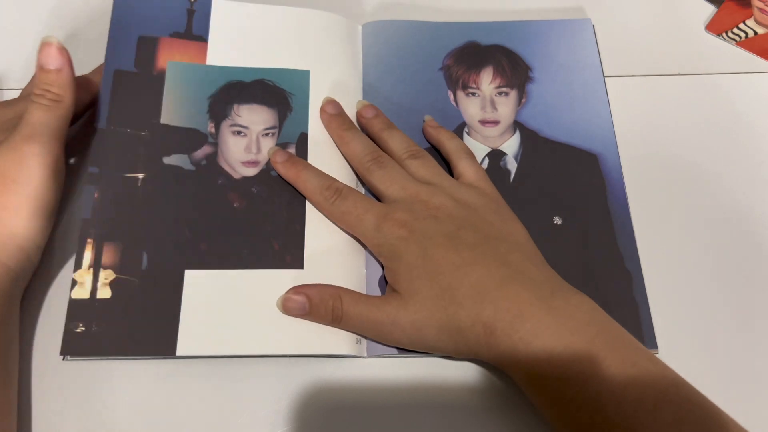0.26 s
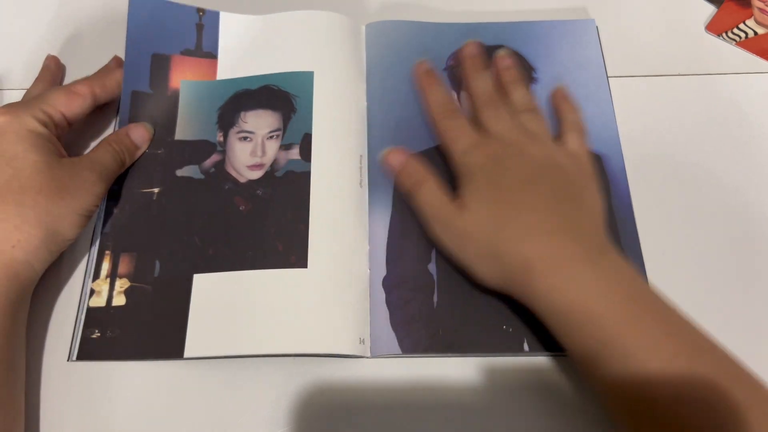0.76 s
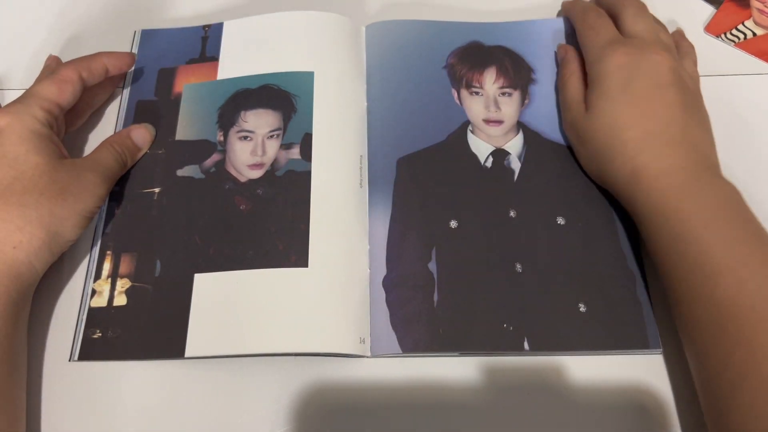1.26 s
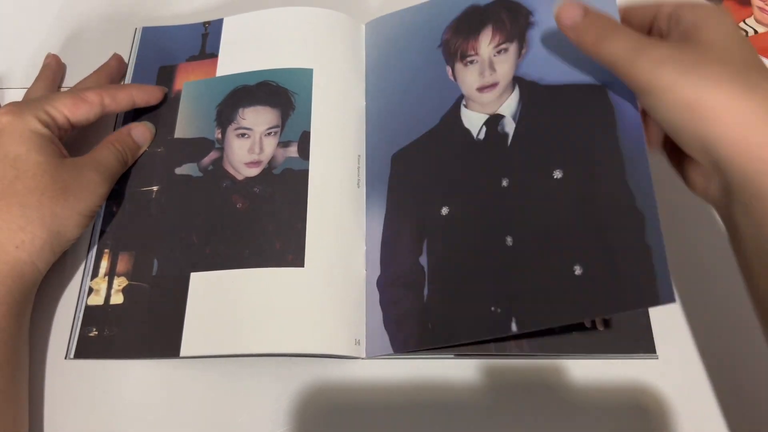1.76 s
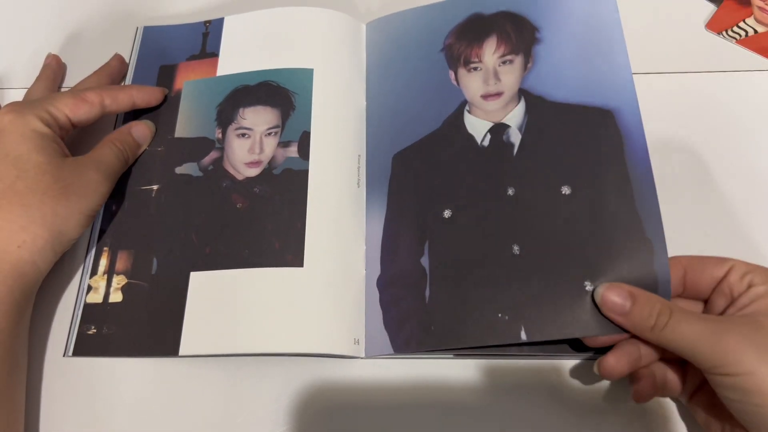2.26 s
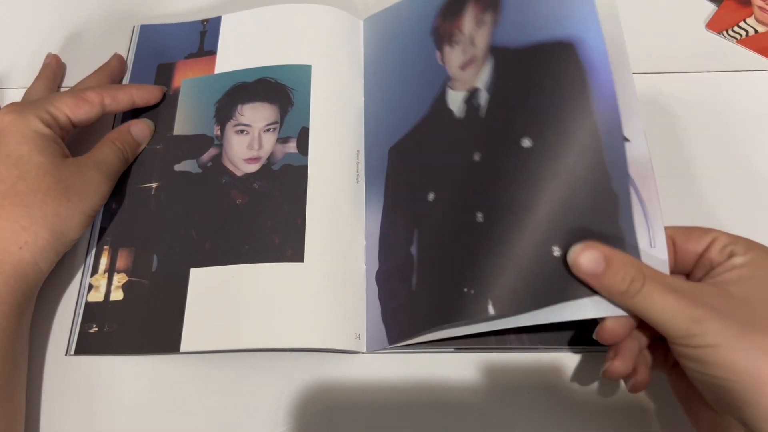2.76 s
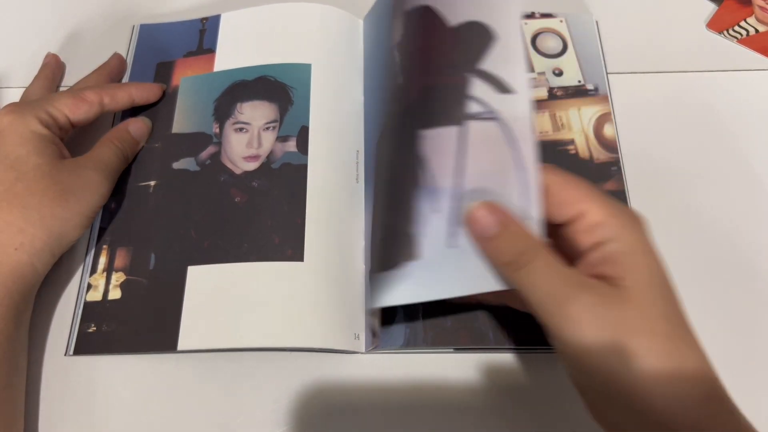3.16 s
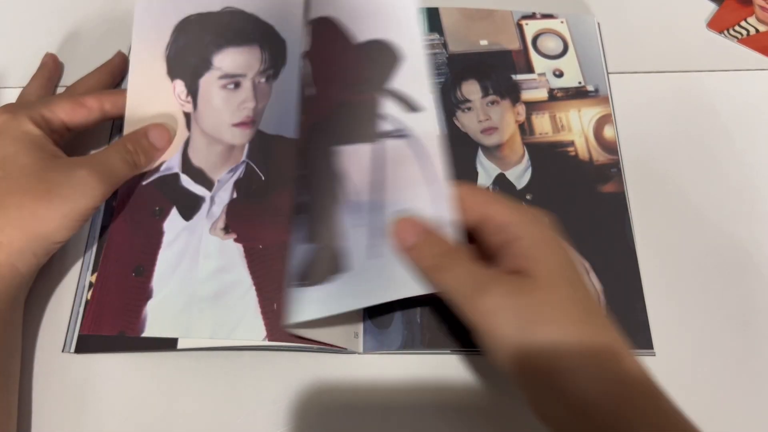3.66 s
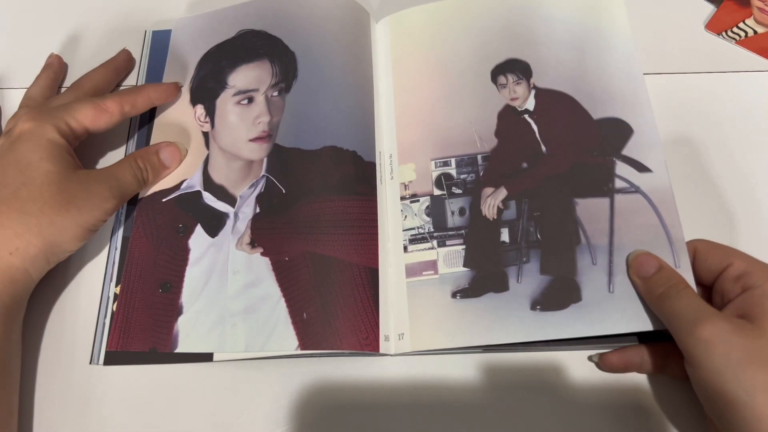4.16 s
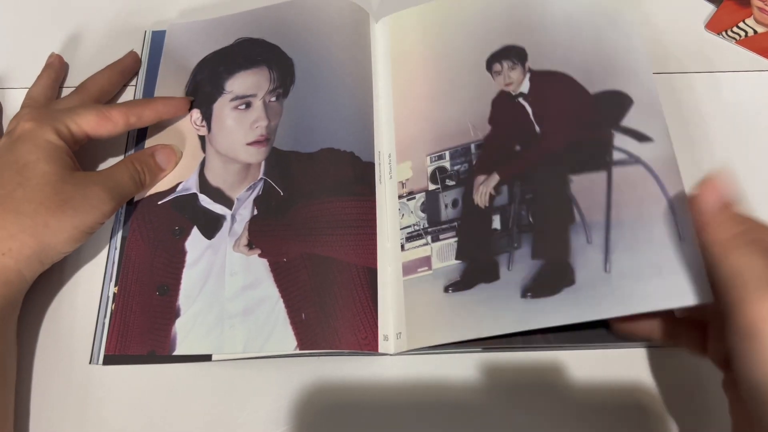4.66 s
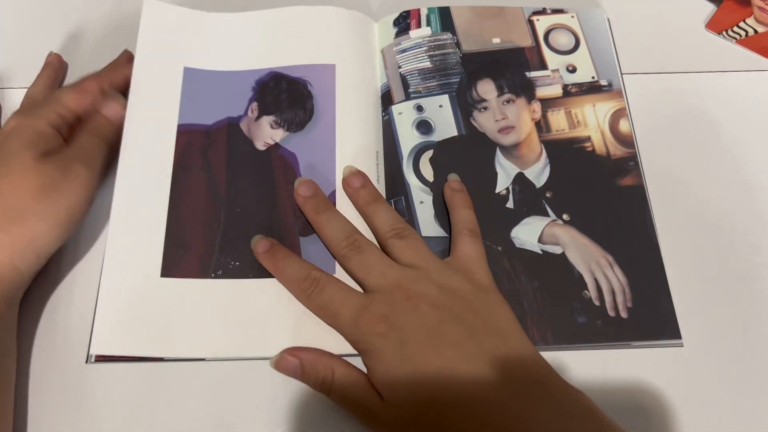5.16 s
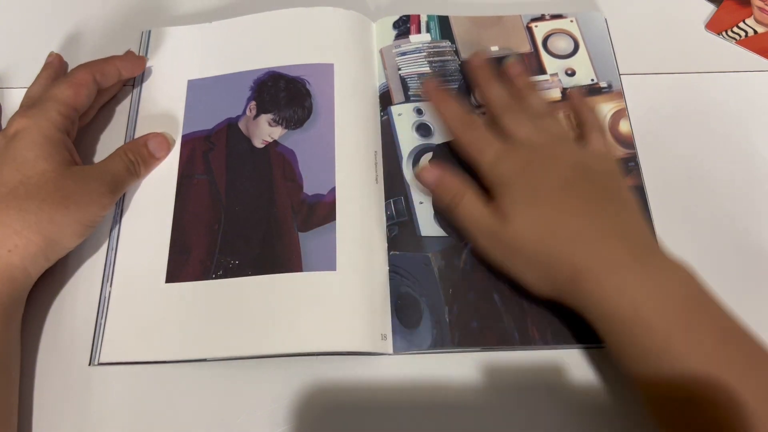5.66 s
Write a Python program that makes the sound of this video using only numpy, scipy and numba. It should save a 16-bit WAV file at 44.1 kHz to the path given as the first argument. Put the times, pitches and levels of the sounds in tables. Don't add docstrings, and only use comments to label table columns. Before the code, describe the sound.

Coated pages of a picture book are stroked by hand, then turned with rustles, flaps, sharp paper snaps and soft table thuds.

```python
import sys
import numpy as np
from scipy import signal
from scipy.fft import rfft, irfft
from scipy.io import wavfile
from scipy.ndimage import uniform_filter1d
from numba import njit

SR = 44100
rng = np.random.default_rng(int(sys.argv[2]) if len(sys.argv) > 2 else 0)


def undo_db(level):
    steps = np.asarray(level, float) / 20
    return 10 ** steps


def generate_wav(sig):
    pcm = np.round(np.clip(np.atleast_2d(sig).T, -1, 1) * 32767).astype(np.int16)
    wavfile.write(sys.argv[1], SR, pcm)


N = 261513
TIME = np.arange(N) / SR
HZ = np.maximum(np.fft.rfftfreq(N, 1 / SR), 1)


def unit(x):
    return x / np.sqrt(np.mean(x ** 2))


def over_hz(table):
    hz, *columns = np.transpose(table)
    return [np.interp(np.log(HZ), np.log(hz), column) for column in columns]


def colour(x, table):
    return unit(irfft(rfft(x) * undo_db(over_hz(table)[0]), N))


@njit
def svf(x, hz, width):
    y, band_state, low_state = np.empty(len(x)), 0., 0.
    for i in range(len(x)):
        g, k = np.tan(np.pi * hz[i] / SR), width / hz[i]
        v = (band_state + g * (x[i] - low_state)) / (1 + g * (g + k))
        band_state = 2 * v - band_state
        low_state += 2 * g * v
        y[i] = k * v
    return y


def band(x, hz, width):
    return svf(x, np.full(len(x), 1. * hz), 1. * width)


def walk(rate):
    k = int(SR / rate)
    held = np.repeat(rng.standard_normal(N // k + 1), k)
    return 2.52 * uniform_filter1d(uniform_filter1d(held, k), k)[:N]


def grains(rate, spread_db):
    hit, size = rng.random(N) < rate / SR, rng.random(N)
    bed = rng.standard_normal(N)
    return bed * (1 + hit * undo_db(spread_db * size))


def swells(s, db, rise, fall, hold=0):
    t = TIME[::32, None]
    before = np.clip(s - t, 0, None) / np.maximum(rise, 1 / SR)
    after = np.clip(t - s - hold, 0, None) / np.maximum(fall, 1 / SR)
    away = (before + after) ** 1.3
    return np.interp(TIME, t[:, 0], np.sqrt(np.sum(undo_db(db - 20 * away) ** 2, axis=1)))


def add(out, x, s):
    i = int(s * SR)
    out[..., i:i + x.shape[-1]] += x[..., :N - i]


def sides(x, pan_db):
    return x * undo_db(np.array([pan_db, -pan_db]).reshape(2, -1) / 2)


def echo(x, t60):
    t = np.arange(int(.4 * SR)) / SR
    tail = rng.standard_normal(len(t)) * np.exp(-np.log(1000) * t / t60) * np.minimum(t / 0.00051, 1)
    return signal.fftconvolve(x, tail / np.sqrt(np.sum(tail ** 2)))[:N]


# (frequency [Hz], level per Hz [dB])
FAN_SPECTRUM = [(18, -46.5), (30, 1.5), (42, 0), (65, 0), (106, -9), (477, -43), (567, -65), (642, -43),
                (953, -38), (1350, -16.5), (1810, 1), (2760, -40), (3710, -17), (5110, -25.5), (11000, -52),
                (14300, -69.5), (22000, -120)]


def fan():
    return undo_db(-69.5 + 0.74 * walk(15)) * colour(rng.standard_normal(N), FAN_SPECTRUM)


# (frequency [Hz], width [Hz], level [dB])
TABLE_MODES = [(63.9, 8.2, 6), (93.3, 4.7, 5.5), (208.5, 71, -2), (310, 42, -12)]
# (time [s], boom level [dB], rise [s], fall [s])
LEANS = [(0, -68, .01, 0.96), (0.399, -59, 0.042, 0.037), (.54, -57.5, 0.047, .11),
         (0.89, -49, 0.048, 0.089), (.2, -71, .3, .3), (1.1, -70, .3, 0.54), (1.52, -63, 0.13, 0.22),
         (1.88, -65, .2, .2), (2.48, -52, 0.5, 0.096), (2.76, -51, 0.27, 0.05), (2.91, -59, 0.16, 0.41),
         (3.3, -60.5, 0.054, 1.4), (3.63, -53, 0.061, 0.17), (3.858, -44.5, 0.029, 0.12),
         (4.23, -62, 0.035, 1.2), (4.69, -61, 0.2, 0.07), (5.22, -53.5, 0.44, 0.06),
         (5.38, -52, 0.094, 0.094), (5.61, -64, 0.17, 0.27), (5.8, -63.5, 0.086, 0.27)]


def table_modes(modes):
    return unit(sum(undo_db(db) * band(rng.standard_normal(N), hz, width) for hz, width, db in modes))


def lean():
    boom = swells(*np.transpose(LEANS))
    upper = undo_db(-10.5) * boom + undo_db(-9) * flaps()
    low_shake = boom * table_modes(TABLE_MODES[:2])
    high_shake = upper * undo_db(1.26 * walk(35)) * table_modes(TABLE_MODES[2:])
    return undo_db(-4.0 + 2.0 * walk(22)) * (low_shake + high_shake)


# (time [s], peak level [dB], pitch [Hz])
LANDINGS = [(.372, -55, 102), (.526, -47.5, 188), (.55, -52, 100), (0.236, -56, 248), (.385, -51.5, 190),
            (2.73, -47, 130), (3.879, -49, 70), (4.601, -59, 85), (1.768, -60, 172), (1.915, -57.5, 105),
            (1.945, -57.5, 154), (2.39, -49.5, 151), (2.926, -49, 178), (4.585, -51, 201.5),
            (4.86, -57, 130), (5.37, -44.5, 90), (5.544, -56, 75.6), (5.799, -54, 95.6), (.69, -56, 95),
            (0.858, -42.5, 102.5), (.86, -50.5, 230), (2.14, -54, 100), (4.36, -54.5, 100),
            (1.827, -57, 175), (2.124, -54, 265.7), (2.263, -47.5, 76.4), (2.456, -47, 89.4),
            (2.698, -44.5, 109), (3.077, -50, 263), (3.184, -68, 234), (3.294, -51.5, 87),
            (3.482, -54.5, 108), (3.626, -61, 271), (3.854, -35, 57), (4.208, -48.5, 90),
            (4.339, -47.5, 211), (4.664, -53.5, 118), (4.814, -40, 185.4), (5.079, -43.5, 86.6),
            (5.178, -51.5, 197), (5.34, -36, 91), (5.588, -42, 81.5), (5.768, -54.5, 122)]


def thuds():
    out, t = np.zeros(N), np.arange(int(.3 * SR)) / SR
    for s, db, hz in LANDINGS:
        t60 = 0.14 * (hz / 100) ** -0.26
        turns = hz * (t + 0.14 * 0.027 * (1 - np.exp(-t / 0.01)))
        overtone = .35 * np.sin(2 * np.pi * 2.1 * turns) * np.exp(-t / .03)
        ring = np.sin(2 * np.pi * turns) + overtone
        fade = np.minimum(t / 0.012, 1) * np.exp(-np.log(1000) * t / max(t60, .02))
        add(out, undo_db(db + 0.5) * ring * fade, s)
    return out


# (frequency [Hz], level per Hz [dB])
SKIN_SPECTRUM = [(700, -28), (1000, -1), (2500, 0), (4500, -0.5), (6500, 0), (9000, 2.5), (12000, -2),
                 (16000, -4)]
# (time [s], frequency [Hz])
AIR_GAP = [(0, 3000), (.33, 3000), (.39, 5200), (.44, 5000), (.55, 3000), (2.55, 3360), (2.61, 3610),
           (2.645, 2800), (2.7, 2300), (2.75, 2000), (2.85, 2000), (3.0, 3400), (3.5, 2690), (5.93, 3000)]
# (time [s], hiss level [dB], rise [s], fall [s], hold [s])
STROKES = [(0, -68, 0.012, 0.06, 0), (0.129, -70.5, 0.048, 0.047, 0.0078), (0.171, -65.5, .03, .03, .01),
           (0.385, -55, 0.027, 0.053, 0.041), (.47, -62.5, .08, 0.27, 0.17),
           (0.709, -48.5, 0.24, 0.31, 0.095), (1.42, -67, 0.078, 0.38, 0),
           (1.504, -55.5, 0.03, 0.03, 0.041), (1.56, -60, .05, 0.15, 0.0066), (1.72, -67, .05, 0.037, 0),
           (1.96, -59, 0.087, 0.055, 0), (1.62, -64.5, 0.18, 0.01, 0.11), (1.813, -61, 0.016, 0.13, 0.31),
           (2.257, -56, 0.004, 0.063, 0.0015), (2.338, -68.5, 0.017, .07, 0.044),
           (2.55, -54.5, 0.0066, 0.6, 0), (2.607, -48, 0.045, 0.14, 0.001), (2.667, -46, 0.082, .08, .16),
           (2.89, -50, 0.0056, 0.036, 0.0043), (3.038, -50, 0.09, 0.27, 0.0063),
           (3.383, -59, 0.012, 0.053, 0.018), (3.581, -57, 0.008, 0.12, 0.015),
           (3.74, -57, 0.027, .1, 0.025), (3.835, -49, 0.26, 0.05, 0.008), (3.885, -59, 0.019, 0.026, 0.08),
           (4.21, -78, 0.001, 0.11, 0), (4.453, -77, 0.053, 0.19, 0), (4.575, -58, 0.016, 0.22, 0.0083),
           (4.838, -65.5, .003, .08, 0), (4.883, -58, 0.022, 0.14, 0.043), (4.922, -56.5, .03, 0.023, 0),
           (5.075, -53.5, 0.078, 0.021, 0.052), (5.475, -52.5, 0.1, 0.27, 0.26)]
# (time [s], scrape level [dB], rise [s], fall [s])
DRAGS = [(.405, -57, .04, .04), (2.612, -40.5, 0.036, 0.13), (2.69, -41.5, 0.072, 0.11),
         (2.75, -47.5, 0.093, 0.11), (2.16, -64, 0.0091, .06), (3.05, -58, 0.065, 0.071),
         (3.41, -59.5, .04, .05), (2.892, -40, 0.0062, 0.026), (3.3, -62, 0.2, 0.057),
         (3.635, -52, 0.043, 0.076), (4.206, -55.5, 0.0017, 0.024), (4.453, -68, 0.073, 0.031),
         (5.143, -58, 0.12, 0.14)]


def slide():
    stroke, drag = swells(*np.transpose(STROKES)), swells(*np.transpose(DRAGS))
    gap_hz = np.interp(TIME, *np.transpose(AIR_GAP)) * (1 + 0.052 * walk(27))
    skin = colour(grains(400, 10.0), SKIN_SPECTRUM)
    patches = sum(undo_db(1.6 * walk(30)) * band(skin, hz, hz / 4) for hz in (4300, 6380, 8140, 10660))
    hiss = unit(skin + .5 * patches) * undo_db(.6 * walk(60))
    rough = grains(370, 7.3)
    gap_ring = svf(svf(rough, gap_hz, 600.), gap_hz, 2000.0)
    upper_ring = svf(rough, 1.467 * gap_hz, 560.0)
    scrape = unit(gap_ring + 0.71 * upper_ring) * undo_db(0.37 * walk(60))
    return undo_db(3.5) * (stroke * hiss + (0.19 * stroke + drag) * scrape)


# (time [s], level [dB], fall [s])
FLAPS = [(0, -55, 0.089), (.235, -62.5, 0.031), (.38, -55, 0.035), (.86, -66, 0.32), (1.15, -74, 0.34),
         (1.3, -70, 0.17), (.13, -69.5, .1), (2.04, -70, 0.093), (1.43, -63, 0.12), (1.67, -70.5, 0.18),
         (2.2, -65, 0.08), (.45, -76, .1), (2.82, -63, .08), (3.68, -59, 0.07), (3.81, -63, 0.044),
         (1.53, -62, .05), (1.78, -56.5, 0.051), (1.849, -54, 0.057), (1.93, -60.5, 0.059),
         (2.131, -61, 0.048), (2.44, -52, 0.08), (2.61, -55.5, 0.12), (2.73, -48, 0.2), (2.94, -48.5, 0.18),
         (3.09, -49.5, 0.028), (3.4, -61.5, 0.65), (3.631, -44, 0.041), (3.75, -47, 0.044),
         (3.85, -62, 0.11), (3.948, -46.5, 0.054), (4.4, -67, 0.17), (4.6, -52, 0.038), (4.68, -51, 0.054),
         (4.871, -46.5, 0.073), (5.07, -52.5, 0.035), (5.188, -54.5, 0.036)]


def flaps():
    s, db, fall = np.transpose(FLAPS)
    return swells(s, db, 0.83 * fall, fall)


# (frequency [Hz], level per Hz [dB])
RUSTLE_SPECTRUM = [(500, -27.5), (800, 3), (1000, 5.5), (1400, 3), (1900, 6), (2800, -0.5), (5000, -11.5)]
# (time [s], rustle level [dB], rise [s], fall [s])
BENDS = [(0, -55, .01, 0.14), (.23, -63, .3, 0.079), (.38, -82.5, .15, .4), (.55, -58, .1, 0.78),
         (.85, -57.5, .6, .35), (1.15, -69.5, .5, 1), (1.52, -58.5, .2, 0.043), (1.85, -57.5, .5, 0.95),
         (2.13, -62, .3, 0.57), (2.27, -56, 0.033, 0.055), (2.37, -64, .06, 0.21), (2.609, -40, .075, 0.54),
         (3.04, -67, .25, 0.13), (3.15, -52, 0.089, 0.37), (3.3, -50, .1, 0.025), (3.4, -49.5, 0.037, 0.15),
         (3.63, -42.5, .055, 0.15), (3.75, -62, .2, 0.075), (3.85, -48, .065, 0.19), (3.95, -56, .3, 0.057),
         (4.21, -66.5, .07, 0.29), (4.34, -63, 0.027, 0.23), (4.45, -54.5, .08, 0.094),
         (4.69, -65, 0.53, 0.11), (4.87, -63, .05, 0.76), (5.07, -48.5, .06, 0.054), (5.15, -75, .1, 0.19),
         (5.47, -65, .28, 0.98), (5.93, -61, .9, 0.11)]


def bend():
    rustle = colour(grains(400, 16.0), RUSTLE_SPECTRUM) * undo_db(1.37 * walk(70))
    flap = unit(band(band(grains(220, 21.0), 378, 380), 378, 380)) * undo_db(3.26 * walk(30.02))
    return undo_db(-4.0) * (swells(*np.transpose(BENDS)) * rustle + flaps() * flap)


# (time [s], peak level [dB], ring [Hz], bright slip above the peak [dB], burst length [s])
SNAPS_LIFTED = [(.0985, -51.5, 3000, 7, 0.0029), (1.501, -42, 1590, 1.5, 0.019),
                (2.099, -46, 900, -1, 0.022), (2.155, -47.5, 3250, -3, 0.033),
                (2.177, -49, 1100, -5, 0.025), (2.34, -44.5, 865, 2, 0.011),
                (2.522, -42.5, 1393, -40, 0.0035), (2.535, -48, 900, -30, 0.039),
                (3.071, -23, 1400, -14.5, 0.0039), (3.292, -35, 1068, -7, 0.0071),
                (3.583, -37, 1750, -8, 0.004), (3.623, -12, 1660, -36, 0.006),
                (3.628, -14.5, 2190, -23.5, 0.0021), (3.722, -37.5, 1100, -19.5, 0.011),
                (3.737, -29.5, 1190, -20, 0.0075), (3.929, -37.5, 1130, -7, 0.019),
                (4.63, -41.5, 790, -10, 0.019), (5.06, -33, 960, -29, 0.016),
                (5.076, -32.5, 2500, -14, 0.012), (5.141, -43, 1240, 2.5, 0.031),
                (5.173, -25.5, 1640, -20.5, 0.009)]
# (time [s], peak level [dB], ring [Hz], slip [dB], burst length [s])
SNAPS_SPINE = [(.348, -45, 1600, -9, 0.0096), (1.4205, -49, 1700, 5, .0015), (1.793, -48, 1200, -7, 0.0024),
               (2.259, -39, 1410, -14, 0.026), (2.45, -57, 654, 2.5, 0.013),
               (2.598, -30.5, 3770, -32.5, 0.034), (2.893, -21.5, 2440, -16, 0.002),
               (2.903, -28.5, 1050, -10.5, 0.017), (2.925, -23, 934, -40, 0.012),
               (3.488, -43.5, 1070, -10.5, .013), (3.587, -32, 1220, -9, 0.02),
               (3.843, -24.5, 816, -13, 0.021), (3.85, -21, 1305, -13, 0.008),
               (3.914, -32, 970, -13, 0.018), (4.579, -46.5, 1300, -6, 0.04),
               (4.663, -45.5, 990, 0.5, 0.026), (4.81, -45, 1050, -34, .004)]
# (time [s], peak level [dB], ring [Hz], slip [dB], burst length [s])
SNAPS_FLAT = [(.22, -57.5, 1030, -1.5, 0.016), (2.368, -40, 1000, -2, 0.009), (2.687, -36, 1500, -15, .004),
              (2.727, -38, 1300, -15, 0.0036), (2.765, -44, 1510, -15, .004), (4.338, -54, 700, -20, .005),
              (3.194, -36.5, 1230, -2, 0.0052), (4.207, -43.5, 1340, -7, 0.009),
              (4.345, -50, 890, -10, 0.011), (4.819, -40, 950, -44, 0.0048),
              (4.832, -42.5, 870, -14, 0.017), (5.337, -58, 1730, 2.5, 0.007)]
# (time [s], peak level [dB], ring [Hz], slip [dB], burst length [s])
SNAPS_CORNER = [(.362, -48, 1000, -16, 0.0069), (.379, -61, 990, 6, .01), (.512, -52, 1000, -10, .01),
                (1.447, -55.5, 1000, 4, 0.012), (1.522, -52, 1280, 1, 0.013), (1.85, -56, 790, -15, .008),
                (2.246, -54, 1200, -15, .006), (2.327, -52.5, 1500, -5, 0.0036),
                (2.346, -53, 1190, 2, .005), (2.574, -43, 1500, 2, 0.0063), (2.901, -30, 3600, 0, 0.0053),
                (2.932, -26.5, 1290, -30, 0.0042), (2.939, -29, 1100, -30, 0.0046),
                (2.948, -30, 1430, -32, .006), (2.957, -32.5, 894, -30, 0.0054),
                (2.976, -40, 775, -30, 0.0041), (2.85, -38.5, 960, -23, 0.0052),
                (3.08, -42, 1200, -16, 0.0078), (3.139, -47, 1420, -18, .006),
                (3.382, -48, 2570, -10, .005), (3.391, -41.5, 930, -10, .015), (3.838, -41, 1500, 14, .003),
                (4.55, -54.5, 1640, -11, .006), (4.571, -52.5, 1500, 1, .006),
                (4.594, -43.5, 1510, -4, 0.011), (4.61, -47.5, 1400, -8, .01), (4.69, -49, 940, -15, .01),
                (4.705, -49.5, 900, -13, 0.0096), (4.845, -46, 930, -20, .008),
                (4.918, -48, 1160, -5, 0.0074), (4.975, -51, 1290, 3, .008), (5.02, -51, 1800, -8, .008),
                (5.047, -43, 931, -15, 0.0094), (5.084, -40.5, 2000, 2, 0.0059),
                (5.154, -42, 820, -15, .008), (5.578, -46, 1800, 4, 0.011)]


def snap(hz, slip_db, length, knock_db):
    t = np.arange(int(.12 * SR)) / SR
    hit, size = rng.random(len(t)) < 600 / SR, rng.standard_normal(len(t))
    hiss = rng.standard_normal(len(t))
    fade = np.exp(-t / max(length, .001))
    pops = (1.43 * hit + 0.19) * size * fade
    pops[0] = 1.8
    soft = np.convolve(pops, np.hanning(int(.6 * SR / hz) + 3))[:len(t)]
    ring = band(band(soft, hz, .5 * hz), hz, 1.8 * hz) - 1.22 * band(soft, 2.27 * hz, 0.63 * hz)
    whole_sheet = 0.56 * band(soft, 920, 350)
    paper_top = signal.butter(4, 3330, fs=SR, output="sos")
    ring = signal.sosfilt(paper_top, ring + whole_sheet)
    knock = band(band(pops, 290, 450), 256, 740)
    slip = band(band(hiss * fade ** 2 + 3.3 * pops, 4700, 9100), 6500, 15000)
    layers = ((ring, 0), (knock, knock_db + 1.0), (slip, slip_db + 5.5))
    return sum(undo_db(db) * x / np.abs(x).max() for x, db in layers)


def snaps():
    out = np.zeros(N)
    places = ((SNAPS_LIFTED, -43), (SNAPS_SPINE, -16), (SNAPS_FLAT, -4.5), (SNAPS_CORNER, -22))
    for rows, knock_db in places:
        for s, db, hz, slip_db, length in rows:
            add(out, undo_db(db) * snap(hz, slip_db, length, knock_db), s)
    return out


def scene():
    paper = slide() + sides(bend() + snaps(), -1.0)
    room = np.array([echo(channel, 0.17) for channel in paper])
    return paper + undo_db(-9) * room + lean() + thuds() + fan()


def top_cut(x):
    return signal.sosfilt(signal.butter(12, 15900, fs=SR, output="sos"), x)


# (frequency [Hz], sum level [dB], difference level [dB],
# share of the difference that follows the sound [0-1], its phase [rad])
MIC_PORTS = [(25, -12.5, -42, .3, 3.0), (49, -0.5, -21, .3, 2.2), (90, 2.5, -19, .5, 3.5),
             (137, 4, -12, 0.6, 5), (295, -1, -9, 0.77, 5.06), (420, -4, -4.5, 0.44, 4.3),
             (565, -6, -5, 1, 5.06), (755, 0, -0.5, 0.62, 2.5), (1030, 0, -4.5, 0.86, 1.9),
             (1517, 1.5, -12.5, 0.62, 2.3), (2000, -3.5, -19, 0.5, 4.7), (2500, -0.5, -4.5, 0.86, 4.5),
             (3000, -1, -6, 0.74, 4.45), (4500, -4, -7, 0.92, 4.7), (5160, -7.5, -5, 0.72, 4.9),
             (5440, -3, -7.5, 1, 1.3), (6400, -1.5, -29.5, 0.77, 0.53), (9550, -7, -19.5, 0.43, 5.5),
             (11600, -7.5, -1, .9, 4.4), (11880, -8, -5, 0.94, 4.7), (12300, -26, 0, 0.6, 7),
             (15800, -10.5, -1, .9, 5.5)]


def record(dry):
    mid, side = (dry[0] + dry[1]) / 2, (dry[0] - dry[1]) / 2
    sum_db, difference_db, share, phase = over_hz(MIC_PORTS)
    share = np.clip(share, 0, 1)
    following = share * np.exp(1j * phase) * rfft(mid)
    reflected = np.sqrt(1 - share ** 2) * rfft(echo(mid, .12))
    side = irfft((2.34 * rfft(side) + following + reflected) * undo_db(difference_db), N)
    mid = irfft(rfft(mid) * undo_db(sum_db), N)
    return top_cut(np.array([mid + side, mid - side]))


dry = scene()
out = record(dry)
generate_wav(out)
```